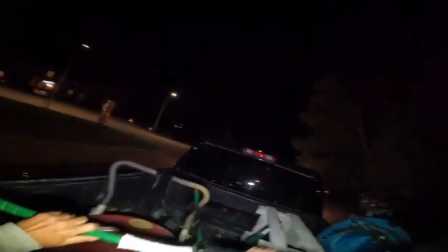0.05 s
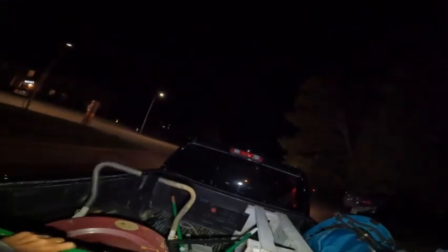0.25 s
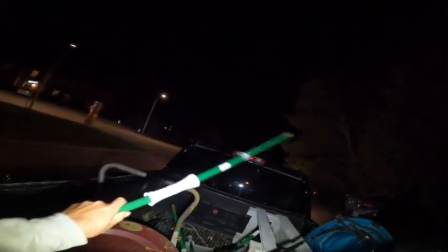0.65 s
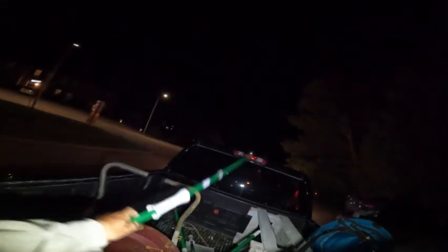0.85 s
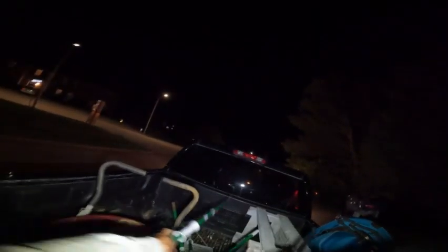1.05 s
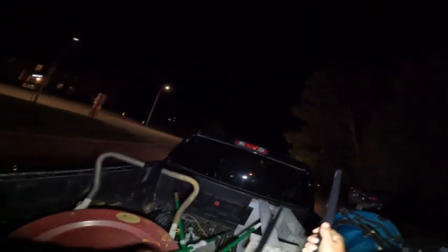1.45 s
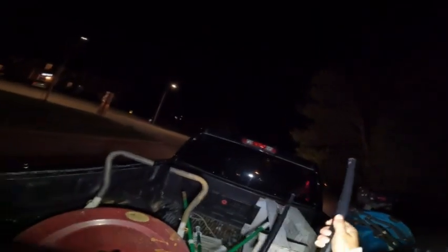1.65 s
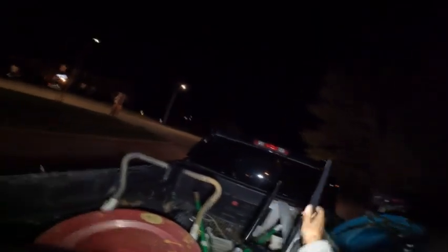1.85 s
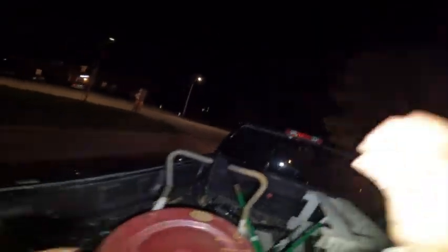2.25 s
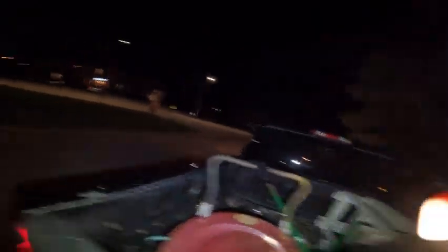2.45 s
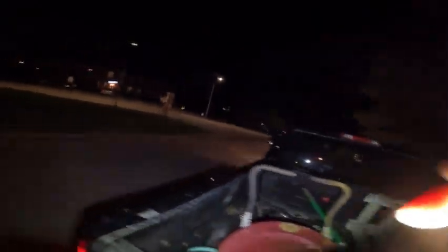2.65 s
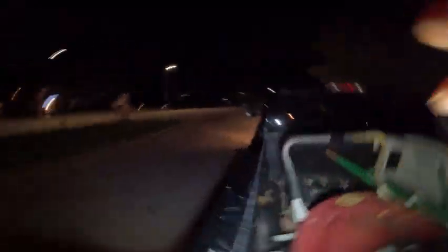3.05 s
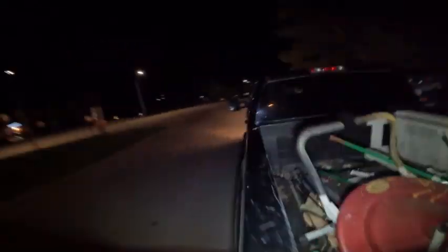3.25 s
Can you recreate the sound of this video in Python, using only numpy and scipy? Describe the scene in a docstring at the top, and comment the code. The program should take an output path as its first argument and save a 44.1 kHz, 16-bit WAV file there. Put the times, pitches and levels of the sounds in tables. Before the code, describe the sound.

Scrap metal crashes into a pickup bed at 0.2 seconds with a low boom and a ringing tube, followed by lighter clinks from 0.7 to 1. A second load clashes at 1.3, a rod ringing high while pieces rattle and scrape. From 2.1 the longest load tumbles in with dense clangs, booms and ringing, settling by about 3.1. A faint engine idles underneath throughout.

```python
"""Outdoors at a pickup, three loads of scrap metal are thrown by hand into the truck bed.
A faint engine idles behind it all. Each blow clashes through the loose pile and sets it
chattering, and heavy ones boom in the bed. Small pieces knock, clink and scrape, while a tube,
a thin stake, a rod, a pipe, a plate and the last load ring with notes of their own."""
import sys
import numpy as np
from scipy import signal
from scipy.io import wavfile

SR = 44100
rng = np.random.default_rng(int(sys.argv[2]) if len(sys.argv) > 2 else 0)


def wrap_up_sound(samples):
    """Save the sound to the file named by the first command line argument, as 16-bit audio."""
    columns = np.atleast_2d(samples).T
    # keep every value between -1 and 1, then stretch to whole-number steps
    tamed = np.clip(columns, -1, 1)
    steps = np.round(tamed * 32767).astype(np.int16)
    wavfile.write(sys.argv[1], SR, steps)


N = 145530
TIME = np.arange(N) / SR

# The engine's exhaust tones. Each row: pitch in Hz, level in dB.
EXHAUST_TONES = [(41, -39), (76, -37)]
# Rumble of engine and road. Each row: frequency in Hz, relative level per Hz in dB.
RUMBLE_COLOUR = [(25, -12.5), (99, -7.5), (190, -19), (400, -26.5), (1200, -28), (2100, -42),
                 (15000, -79.5)]
# Heavy blows that shake the bed. Each row: start in seconds, level in dB.
BED_THUMPS = [(0.249, -18), (.275, -13), (1.345, -15.5), (2.173, -16), (2.397, -16.5)]
# The bed's own notes. Each row: pitch in Hz, relative level in dB.
BED_NOTES = [(80, 3.5), (127, 2.5), (274, -2.5)]
# The load slides and settles between blows. Each row: time in seconds, level in dB.
SLIDE_LEVELS = [(.24, -27.5), (.33, -22), (.4, -31.5), (.5, -27), (.6, -53), (1.32, -58), (1.45, -33),
                (1.53, -37.5), (1.83, -35), (2.06, -51.5), (2.17, -24), (2.4, -27), (2.6, -25.5),
                (2.7, -32.5), (2.98, -34.5), (3.1, -63)]
# The tone of that sliding. Each row: frequency in Hz, relative level in dB.
SLIDE_TONE = [(300, 0.5), (1000, 0.5), (3500, 1), (8000, -17)]
# Light, bright scrapes of edge on edge. Each row: start in seconds, level in dB.
EDGE_SCRAPES = [(1.551, -43), (1.706, -37), (1.808, -43), (1.837, -39), (1.873, -39), (1.987, -43),
                (2.733, -36), (2.867, -27), (3.054, -41), (3.208, -57)]
# Small pieces hit the bed and each other. Each row: start in seconds, pitch in Hz, level in dB.
SMALL_KNOCKS = [(.345, 284.4, -13.5), (0.887, 1050, -23.5), (.972, 450, -26), (1.616, 1610, -19),
                (1.8843, 1690, -18), (2.102, 158.2, -11), (2.252, 665, -18), (2.313, 273.3, -7.5),
                (2.399, 433, -12), (2.466, 657, -14.5), (2.518, 263.9, -14), (2.671, 504, -16.5),
                (2.686, 260, -17), (2.7253, 845, -16.5), (2.865, 2817, -16)]

# When each ringing piece is hit. Each row: start in seconds, level in dB.
TUBE_HITS = [(.2303, -30), (.254, -24.5), (.3141, -21.5), (.4298, -25), (.4872, -36)]
STAKE_HITS = [(.6952, -30), (.8499, -37), (1.04, -41)]
ROD_HITS = [(1.349, -18.5)]
PIPE_HITS = [(2.255, -23), (2.828, -35)]
LAST_LOAD_HITS = [(2.26, -33.5), (2.395, -29.5), (2.51, -31), (2.627, -43)]
PLATE_HITS = [(2.122, -26.5), (2.3255, -26.5), (2.36, -26), (2.627, -31.5), (2.865, -34), (3.016, -46)]
# The notes each piece rings with. Each row: pitch in Hz, relative level in dB.
TUBE_NOTES = [(947, 1.5), (1959, -6), (2126, -5.5), (2966, -2.5), (3386, -15), (3456, -3.5), (4630, -9),
              (5232, -8), (5700, -14), (6760, -9)]
STAKE_NOTES = [(2600, -7), (3892, -1.5), (5205, 2.5), (6830, -7)]
ROD_NOTES = [(3500, -18), (4490, -6), (5151, -3.5)]
PIPE_NOTES = [(1766, -4), (1860, -9), (2138, 0)]
LAST_LOAD_NOTES = [(495, 2.5), (635, -1), (947, 1), (1961, 5)]
PLATE_NOTES = [(2977, -4), (3354, 0.5), (3542, 3), (3978, -3.5)]
# The stake's longest note starts at full strength, fades a little, then is quickly damped to a faint
# ring. The rod's changes in level as the hand shifts on it. Each row: time in seconds, level in dB.
STAKE_LONG_NOTE = [(.696, -34.5), (.765, -39), (.812, -57.5), (1.12, -58.5)]
ROD_LONG_NOTE = [(1.35, -28.5), (1.43, -27.5), (1.48, -22.5), (1.83, -38), (2.09, -77)]

# Blows on the pile. Each row: start in seconds, then levels in dB of the body, clank, clash and sizzle.
PILE_BLOWS = [(0.2298, -19, -17, -19.5, -29.5), (0.246, -34, -48, -17, -29), (0.254, -28, -40, -18, -26),
              (0.292, -24, -22, -17.5, -30), (0.3136, -43, -31, -23, -29.5), (0.342, -21, -49, -18.5, -34),
              (0.4293, -19.5, -25, -17.5, -36), (0.4593, -30, -21, -19.5, -34),
              (0.4871, -24.5, -21, -21, -32.5), (0.6955, -25.5, -22.5, -24.5, -30),
              (0.8487, -26, -29, -26, -40.5), (1.038, -33, -36, -28, -42), (1.34, -25, -19.5, -11, -31.5),
              (1.351, -24, -43, -17, -24.5), (1.421, -20.5, -32.5, -23.5, -36.5),
              (1.4596, -33, -27, -36, -33.5), (1.57, -29.5, -17.5, -23, -32),
              (1.616, -33.5, -22.5, -26.5, -49), (1.6475, -26.5, -21.5, -37, -32),
              (1.765, -25, -23.5, -31.5, -34.5), (1.888, -23, -23, -27, -32.5),
              (2.0952, -28, -15.5, -15, -21.5), (2.114, -20.5, -18.5, -26, -29.5),
              (2.155, -20, -19, -17.5, -28), (2.168, -62, -19.5, -16.5, -30),
              (2.2459, -19.5, -14.5, -18.5, -26), (2.31, -16.5, -19, -24, -36),
              (2.3254, -32, -30, -13.5, -25), (2.393, -19, -17.5, -16, -32),
              (2.4622, -23.5, -21, -18.5, -44), (2.514, -22, -22.5, -26, -40),
              (2.5433, -42, -20, -24.5, -37), (2.624, -21.5, -22.5, -17, -38),
              (2.6691, -30, -23.5, -24, -53), (2.7232, -31, -22.5, -16.5, -36.5),
              (2.812, -23, -17.5, -21.5, -44), (2.828, -22.5, -23.5, -24, -35),
              (2.864, -54, -25.5, -16, -25.5), (2.9602, -26, -24.5, -30.5, -65),
              (3.0168, -27, -29.5, -28, -62)]
# Where the body, clank, clash and sizzle lie, each as a frequency in Hz.
BLOW_RANGES_HZ = [320, 1100, 3500, 8500]
# The tone of the crunch and of the pile's ringing. Each row: frequency in Hz, relative level in dB.
CRUNCH_COLOUR = [(60, -3), (140, -2.5), (280, -3), (430, -8), (1100, -3.5), (2200, -8.5), (4500, -3),
                 (7300, 0), (9000, -7.5), (12500, -6), (15000, -56)]
PILE_COLOUR = [(120, -15), (280, -5), (2200, -12), (4000, -5.5), (5600, -13), (7200, -1), (13000, -19)]
# How long each lasts. Each row: frequency in Hz, fade time in seconds (the time to fall by 60 dB).
CRUNCH_FADE = [(150, 0.14), (1100, 0.15), (10000, 0.021)]
PILE_FADE = [(150, 0.53), (1100, 0.23), (10000, 0.11)]
# How wide the sound is. Each row: frequency in Hz, level of the sides against the middle in dB.
STEREO_WIDTH = [(250, -31), (700, -12.5), (7000, -10), (13000, -7.5)]

LEFT_VS_RIGHT = np.array([[1], [-1]])  # adds on the left, takes away on the right
CUTOFF_HZ = 14800


def from_db(db):
    """Turn decibels into a gain."""
    return 10 ** (np.asarray(db) / 20)


def rms_one(x):
    """Scale a signal to an average (rms) level of one."""
    return x / np.sqrt(np.mean(x ** 2) + 1e-20)


def at_hz(table, hz):
    """Read between a table's rows, with octaves evenly spaced."""
    row_hz, value = np.transpose(table)
    return np.interp(np.log(hz), np.log(row_hz), value)


def drift(rate_hz):
    """A smooth random wobble, about one in size."""
    r = np.exp(-2 * np.pi * rate_hz * 20 / SR)  # worked out on every 20th sample
    slow = signal.lfilter([1], [1, -2 * r, r * r], rng.standard_normal(N // 20 + 2002))[2000:]
    return np.interp(np.arange(N) / 20, np.arange(len(slow)), rms_one(slow))


def clicks(starts, sizes):
    """One click at each start time, in seconds."""
    out = np.full(N, 1e-18)
    np.add.at(out, (np.asarray(starts) * SR).astype(int), sizes)
    return out


def ring(hits, hz, fade_s):
    """Each click starts a fading pure tone as big as itself."""
    r, angle = from_db(-60 / (fade_s * SR)), 2 * np.pi * hz / SR
    return signal.lfilter([0, np.sin(angle)], [1, -2 * r * np.cos(angle), r * r], hits)


def fading_level(starts, db, fade_s, rise_s):
    """The level of hits that rise and fade; where they overlap, their energies add."""
    energy = clicks(starts, from_db(db) ** 2)
    fall, rise = 10 ** (-6 / (fade_s * SR)), np.exp(-1 / (rise_s * SR))
    return np.sqrt(signal.lfilter([1 - rise], [1, -rise - fall, rise * fall], energy))


def damped(fade_s, hz, twice_as_fast_hz=4500):
    """Shorten a fade time, because high sounds die sooner."""
    return fade_s / (1 + hz / twice_as_fast_hz)


def placed(hz):
    """Each note reaches left and right at slightly different strengths."""
    side = from_db(at_hz(STEREO_WIDTH, hz)) * rng.standard_normal()
    return 1 + side * LEFT_VS_RIGHT


def noise_bands(low_hz, count):
    """Bands of stereo noise, each a third of an octave wide."""
    white = rng.standard_normal((2, 2, N + 8000))
    for k in range(count):
        hz = low_hz * 2 ** (k / 3)
        band = signal.butter(3, [hz / 1.1225, hz * 1.1225], "band", fs=SR, output="sos")
        mid, side = signal.sosfilt(band, white[k % 2])[:, -N:]
        yield hz, rms_one(mid) + from_db(at_hz(STEREO_WIDTH, hz)) * rms_one(side) * LEFT_VS_RIGHT


def idling_engine(waver_db=2.5, waver_rad=0.8, rumble_db=-32):
    """The exhaust hums in wavering tones over a low rumble."""
    hum = rumble = 0
    for hz, db in EXHAUST_TONES:
        level = from_db(db + waver_db * drift(5.9))
        hum += level * np.sqrt(2) * np.sin(2 * np.pi * hz * TIME + waver_rad * drift(9.3))
    for hz, noise in noise_bands(25, count=29):
        rumble += noise * from_db(at_hz(RUMBLE_COLOUR, hz)) * np.sqrt(hz)
    return hum + from_db(rumble_db) * rms_one(rumble)


def bed_boom(fade_s=0.24, lowest_hz=44.2):
    """Heavy blows make the panels of the truck bed boom."""
    starts, db = np.transpose(BED_THUMPS)
    boom = 0
    for hz, note_db in BED_NOTES:
        hits = clicks(starts + rng.uniform(0, 0.0043, len(starts)), from_db(db))
        boom += from_db(note_db) * ring(hits, hz, fade_s)
    return signal.sosfilt(signal.butter(2, lowest_hz, "high", fs=SR, output="sos"), boom)


def slide_db(times, hz):
    """How loud the sliding load is at one frequency; silent before and after it moves."""
    return np.interp(times, *np.transpose(SLIDE_LEVELS), left=-100, right=-100) + at_hz(SLIDE_TONE, hz)


def ringing_piece(hits, notes, fade_s, waver_rad=0.33):
    """A piece of metal rings with all its notes at once; every hit adds energy."""
    tones = 0
    for hz, db in notes:
        gain = placed(hz) * from_db(db)
        phase = 2 * np.pi * (hz * TIME + rng.random()) + waver_rad * drift(36)
        tones += gain * np.sin(phase)
    return fading_level(*np.transpose(hits), fade_s, rise_s=0.001) * tones


def small_knocks(fade_s=0.12, overtone_ratio=1.1, overtone_db=-8.5):
    """Each small piece gives a short note and a weaker one just above it."""
    out = 0
    for start, hz, db in SMALL_KNOCKS:
        notes = [(hz, 0), (hz * overtone_ratio, overtone_db)]
        out += ringing_piece([(start, db)], notes, damped(fade_s, hz))
    return out


def held_bar(levels, hz):
    """A bar held in the hand sings one pure note until it is damped."""
    times, db = np.transpose(levels)
    level = np.interp(TIME, times, from_db(db), left=0, right=0)
    return np.sqrt(2) * level * np.sin(2 * np.pi * hz * TIME)


def blow_db(hz):
    """How strong each blow is at one frequency."""
    shares = [np.interp(np.log(hz), np.log(BLOW_RANGES_HZ), row) for row in np.eye(len(BLOW_RANGES_HZ))]
    return np.array(PILE_BLOWS)[:, 1:] @ shares


def pile_crunch(chatter_db=-15.5, chatter_fade_s=0.25, flutter_db=3.5, treble_left_db=3):
    """Each blow is a short crunch, followed by loose pieces chattering, sliding and scraping."""
    treble_rise_s, body_rise_s, scrape_low_hz = 0.00013, 0.01, 1500
    starts, out = np.array(PILE_BLOWS)[:, 0], 0
    flutter = rms_one(from_db(flutter_db * drift(79)))
    scrapes = fading_level(*np.transpose(EDGE_SCRAPES), fade_s=0.074, rise_s=treble_rise_s)
    for hz, noise in noise_bands(62.5, count=25):
        db = blow_db(hz)
        rise_s = treble_rise_s + body_rise_s * min(BLOW_RANGES_HZ[0] / hz, 1)  # lows build more slowly
        crunch = fading_level(starts, db, at_hz(CRUNCH_FADE, hz), rise_s)
        chatter = from_db(chatter_db) * fading_level(starts, db, damped(chatter_fade_s, hz), rise_s)
        sliding = from_db(slide_db(TIME, hz))
        scraping = scrapes * hz / np.hypot(hz, scrape_low_hz)
        loose = flutter * np.sqrt(chatter ** 2 + sliding ** 2 + scraping ** 2)
        level = np.hypot(crunch, loose) / np.sqrt(3)  # three bands share an octave
        lean_db = treble_left_db * (hz / CUTOFF_HZ) ** 2 * LEFT_VS_RIGHT
        out += noise * level * from_db(at_hz(CRUNCH_COLOUR, hz) + lean_db)
    return out


def pile_clash(note_count=130, contacts_per_s=110, contact_db=-9, uneven_db=4.5):
    """Blows and sliding contacts ring the pile's many close notes, each with its own force and delay."""
    slide_start, slide_end = SLIDE_LEVELS[0][0], SLIDE_LEVELS[-1][0]
    contact_count = int(contacts_per_s * (slide_end - slide_start))
    contacts = rng.uniform(slide_start, slide_end, 400)[:contact_count]
    starts, out = np.concatenate([np.array(PILE_BLOWS)[:, 0], contacts]), 0
    edges_hz = np.linspace(np.sqrt(150), np.sqrt(13000), note_count + 1) ** 2
    for low, high in zip(edges_hz, edges_hz[1:]):
        hz = rng.uniform(low, high)
        force, sign, delay = rng.standard_normal((500, 3))[:len(starts)].T
        db = np.concatenate([blow_db(hz), slide_db(contacts, hz) + contact_db])
        sizes = from_db(db + at_hz(PILE_COLOUR, hz) + uneven_db * force) * np.sign(sign)
        band_share = np.sqrt(2 * np.log2(high / low))  # one note carries its whole band's energy
        hits = clicks(starts + 0.002 * abs(delay), sizes * band_share)
        out += placed(hz) * ring(hits, hz, at_hz(PILE_FADE, hz))
    return out


def scene():
    """Add up the scrap metal, the booming bed and the engine."""
    metal = pile_crunch() + pile_clash() + small_knocks()
    metal += held_bar(STAKE_LONG_NOTE, hz=4184) + held_bar(ROD_LONG_NOTE, hz=4097)
    metal += ringing_piece(TUBE_HITS, TUBE_NOTES, fade_s=0.39)
    metal += ringing_piece(STAKE_HITS, STAKE_NOTES, fade_s=0.2)
    metal += ringing_piece(ROD_HITS, ROD_NOTES, fade_s=0.44)
    metal += ringing_piece(PIPE_HITS, PIPE_NOTES, fade_s=0.92)
    metal += ringing_piece(LAST_LOAD_HITS, LAST_LOAD_NOTES, fade_s=1)
    metal += ringing_piece(PLATE_HITS, PLATE_NOTES, fade_s=0.31)
    pan_db = (0.3 - 0.22 * TIME) * LEFT_VS_RIGHT  # the metal starts a little left and moves right
    return metal * from_db(pan_db) + bed_boom() + idling_engine()


def record(dry, ceiling=0.81):
    """Round off the loudest peaks and cut the highest treble."""
    rounded = ceiling * np.tanh(dry / ceiling)
    return signal.sosfilt(signal.ellip(10, 0.1, 80, CUTOFF_HZ, fs=SR, output="sos"), rounded)


dry = scene()
out = record(dry)
wrap_up_sound(out)
```